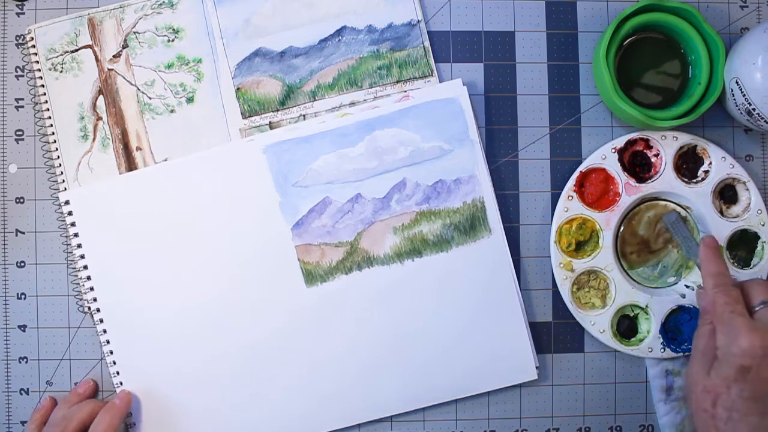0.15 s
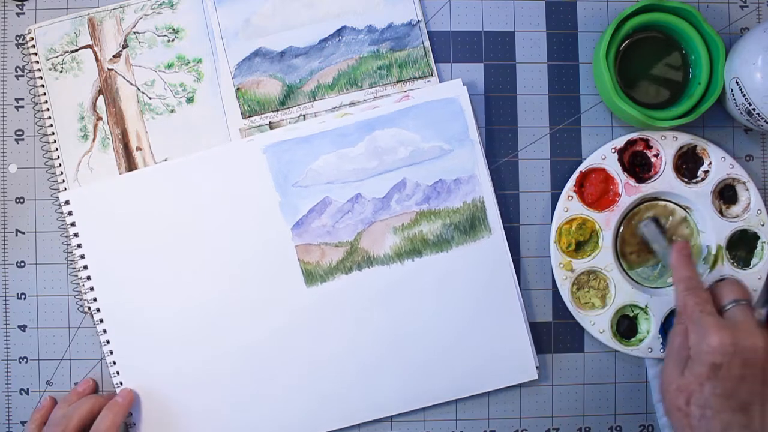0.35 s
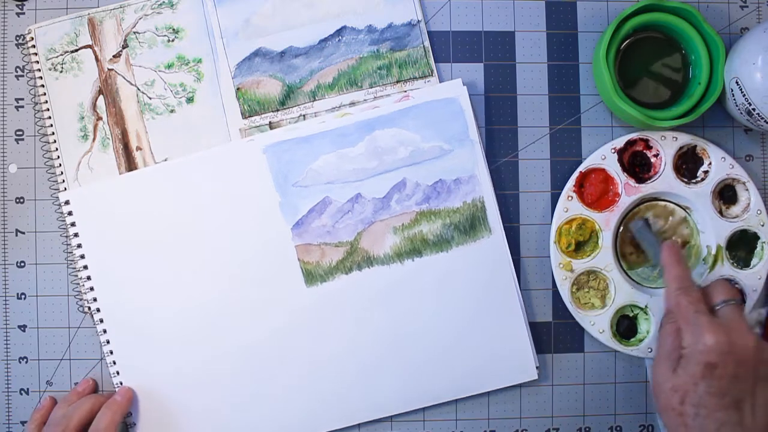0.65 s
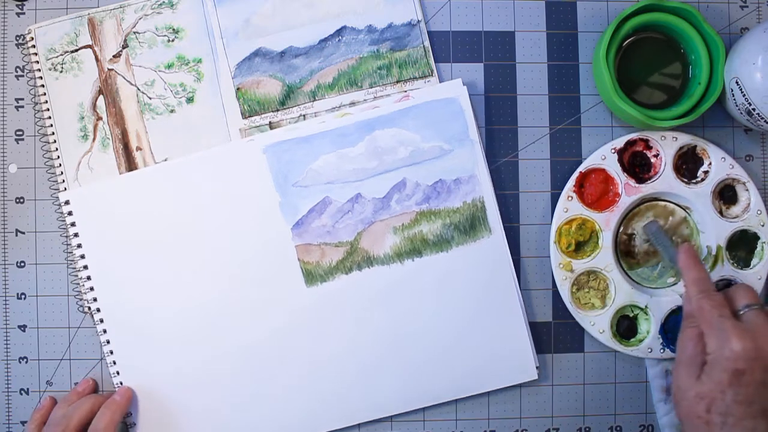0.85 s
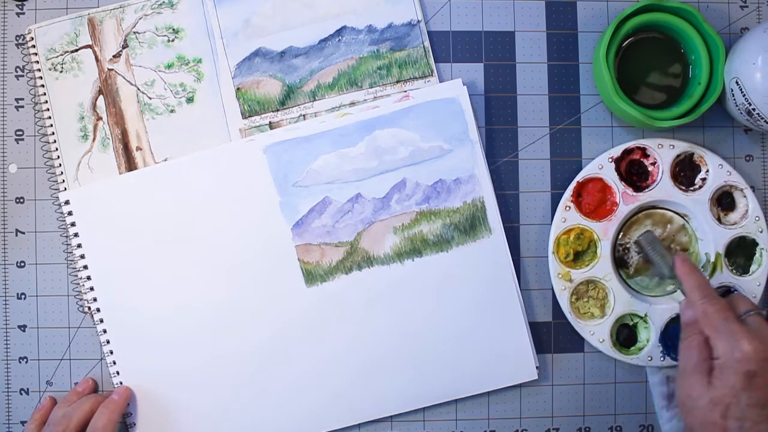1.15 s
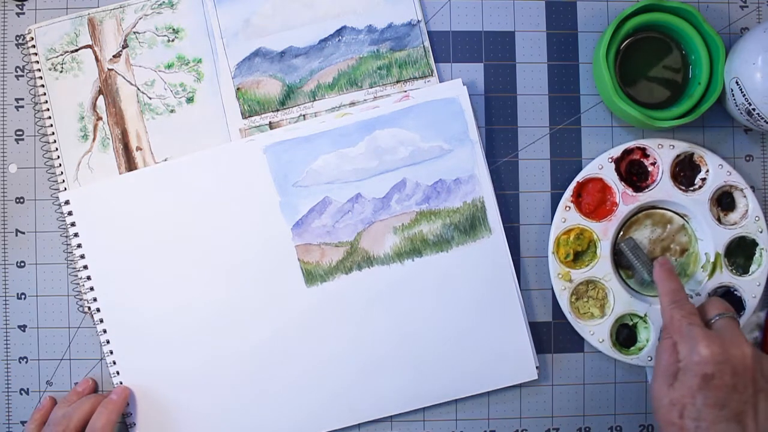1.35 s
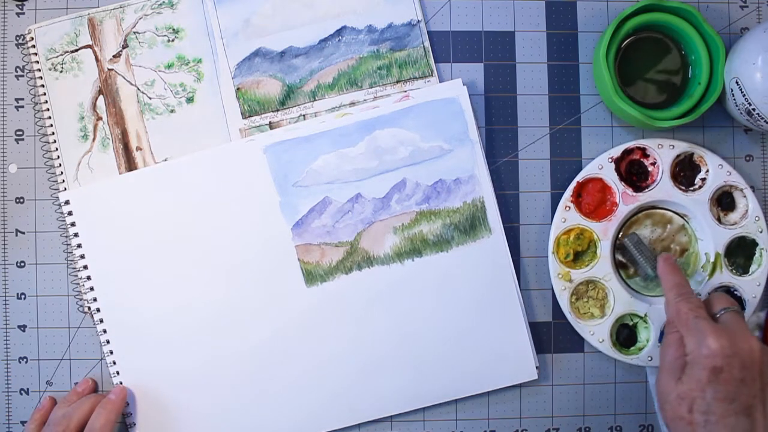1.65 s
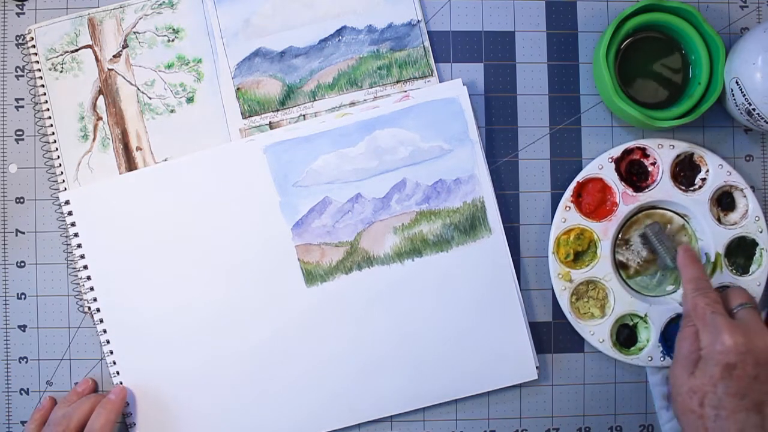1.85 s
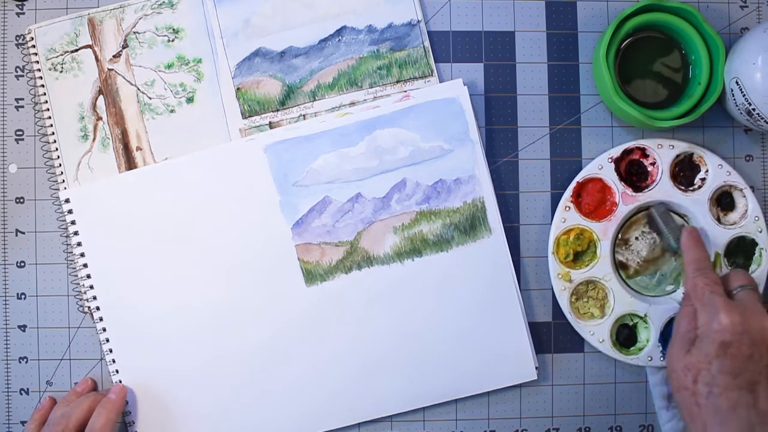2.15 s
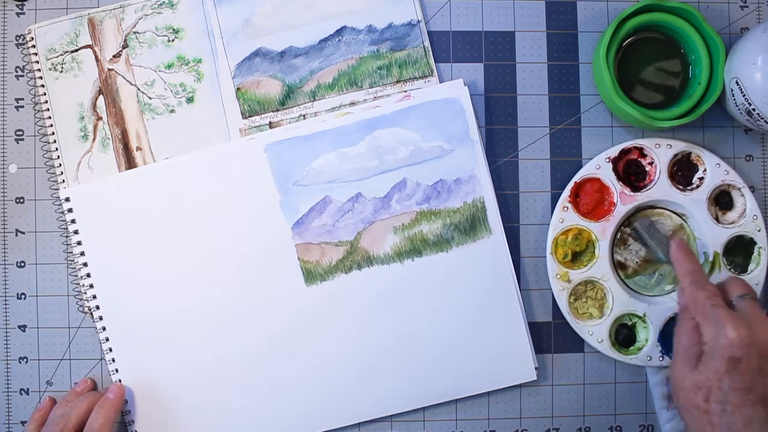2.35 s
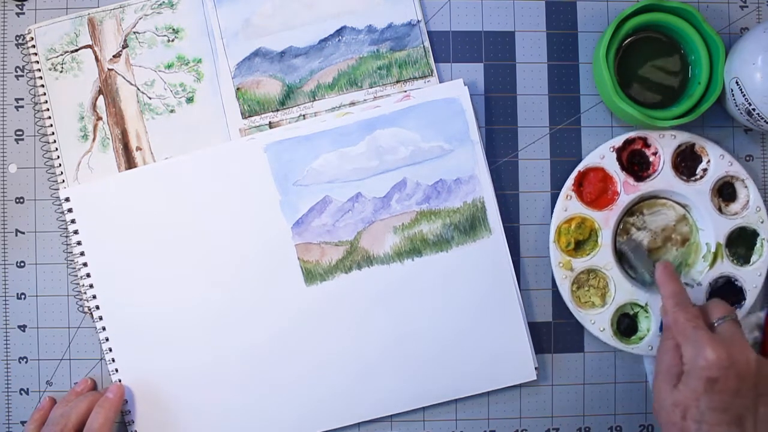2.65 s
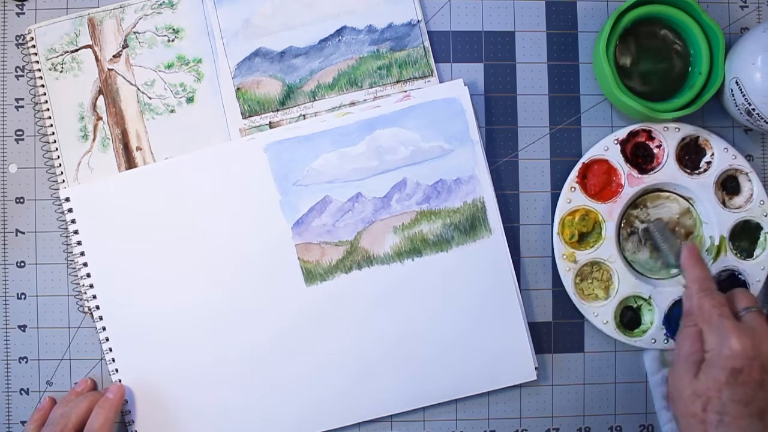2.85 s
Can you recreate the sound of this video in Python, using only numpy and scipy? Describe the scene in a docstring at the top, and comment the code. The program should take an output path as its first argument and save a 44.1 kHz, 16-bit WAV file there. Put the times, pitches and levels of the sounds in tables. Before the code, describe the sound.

Short, scratchy toothbrush strokes rub around a plastic palette well, about three a second, after a soft wet smear. The bristles bite, drag and snap free while the paint faintly pops and fizzes, close up in a quiet room.

```python
"""One soft wet wipe, then eight short scratchy strokes: a toothbrush scrubs paint in a plastic palette.
In each stroke the bristles bite, drag and lift; their stick-slip friction is a dense train of tiny
clicks, and bent tufts snap free on the way. These forces excite the resonances of the palette.
Wet paint squelches, pops and fizzes, and the palette bumps the table once, in a small quiet room."""
import sys
import numpy as np
from scipy import signal
from scipy.fft import rfft, irfft
from scipy.io import wavfile

SR = 44100
rng = np.random.default_rng(int(sys.argv[2]) if len(sys.argv) > 2 else 0)


def inscribe(sig):
    """Save sig as 16-bit PCM at rate SR to the path in sys.argv[1].

    A 1-D sig is mono; a 2-D sig holds one channel per row.
    Samples are clipped to [-1, 1] before scaling.
    """
    pcm = np.round(np.clip(np.atleast_2d(sig).T, -1, 1) * 32767)
    wavfile.write(sys.argv[1], SR, pcm.astype(np.int16))


N = 132300


def undb(db):
    """Amplitude ratio of a level in decibels."""
    return 10 ** (np.asarray(db) / 20)


def unit(x):
    """Normalisation to an rms of 1."""
    return x / np.sqrt(np.mean(x ** 2))


def scatter(count):
    """Gaussian variation, limited to two standard deviations."""
    return np.clip(rng.standard_normal(count), -2, 2)


def clock():
    """Time axis of one event, in seconds."""
    return np.arange(SR // 2) / SR


def gate(t, attack_s, length_s, release_s):
    """Envelope with linear attack, hold and exponential decay."""
    return np.minimum(t / attack_s, 1) * np.exp(-np.maximum(t - length_s, 0) / release_s)


def add(out, start_s, x):
    """Superposition of x on out, from start_s."""
    i = max(int(start_s * SR), 0)
    out[i:i + len(x)] += x[:max(len(out) - i, 0)]


def freqs():
    """Frequency axis of the responses, in Hz."""
    return np.maximum(np.fft.rfftfreq(4096, 1 / SR), 1)


def outline(points):
    """Spectral envelope in dB, interpolated over log frequency."""
    hz, db = np.array(points, float).T
    return np.interp(np.log(freqs()), np.log(hz), db)


def peak(hz, width_hz, lift_db):
    """One resonance: a Lorentzian curve in dB."""
    return lift_db / (1 + (2 * (freqs() - hz) / width_hz) ** 2)


def tilt(bass_db, treble_db, bass_hz=1460, treble_hz=3230):
    """Spectral tilt in dB from a low and a high shelf."""
    f = freqs()
    return bass_db / (1 + (f / bass_hz) ** 8) + treble_db / (1 + (treble_hz / f) ** 8)


def ring(x, response_db):
    """Source and filter: x drives a minimum-phase response scaled to unit energy."""
    cepstrum = irfft(np.log(undb(response_db)))
    half = len(cepstrum) // 2
    cepstrum[1:half] *= 2  # folding the cepstrum makes the filter causal
    cepstrum[half + 1:] = 0
    impulse = irfft(np.exp(rfft(cepstrum)))[:half]
    return signal.oaconvolve(x, impulse / np.linalg.norm(impulse))[:len(x)]


def flicker(x, changes_per_s=112.2, depth_db=2):
    """Amplitude modulation, band by band: the colour wavers as the bristles in contact change."""
    # bands that waver independently: centre_hz
    centres = [900, 1400, 2100, 3200, 4800, 7200, 10500]
    spectrum = rfft(x)
    log_f = np.log(np.maximum(np.fft.rfftfreq(len(x), 1 / SR), 1))
    steps, out = np.arange(len(x)) * changes_per_s / SR, 0
    for share in np.eye(len(centres)):
        waver = np.interp(steps, np.arange(1024), scatter(1024))
        band = irfft(spectrum * np.interp(log_f, np.log(centres), share), len(x))
        out = out + band * undb(depth_db * waver)
    return out


def stick_slip(t, slips_per_s, spread_db=3, catches_per_s=320, catch_db=2):
    """Stick-slip friction: tiny random impulses swell and fade as the bristles catch and let go."""
    sizes = undb(spread_db * scatter(len(t))) * np.sign(rng.standard_normal(len(t)))
    catch = np.interp(t * catches_per_s, np.arange(len(t)), scatter(len(t)))
    slips = rng.random(len(t)) < slips_per_s / SR
    return unit(flicker(slips * sizes * undb(catch_db * catch)))


def wet_paint():
    """Wet friction squelches through one broad resonance; bursting bubbles give brief noise pulses."""
    # smears of paint: start_s, rise_s, length_s, fall_s, level_db, centre_hz, lift_db, treble_db
    wipes = [(0.010, 0.0086, .270, 0.028, -53.5, 1370, 9, 5.5),
             (0.073, 0.0066, 0.095, 0.025, -44.5, 1170, 5, -4.5),
             (0.138, 0.0052, 0.013, 0.0074, -37.5, 1520, 8, 0),
             (0.082, 0.018, 0.11, 0.013, -50.5, 400, 7, -13), (2.254, 0.0046, 0.031, .016, -41, 557, 4, 3),
             (2.295, 0.0046, 0.029, 0.0061, -35, 1030, 31, -11),
             (2.339, 0.0093, 0.023, 0.0085, -31, 1090, 30, -6),
             (2.723, .006, 0.035, 0.0055, -36.5, 1350, 16, -9),
             (2.736, 0.0099, 0.086, 0.022, -47, 480, 2.5, -8)]
    # spectral envelope of wet friction: frequency_hz, gain_db
    wet_spectrum = [(60, -29), (170, -9), (280, -4), (1400, -2), (2500, -9.5), (5000, -13.5), (8000, -11.5),
                    (10000, -26), (14000, -40)]
    # bursting bubbles: start_s, level_db, centre_hz, width_hz
    pops = [(0.1877, -40.5, 8500, 5500), (0.229, -43.5, 595, 1100), (0.473, -38, 7950, 4000),
            (2.432, -42.5, 7740, 3000), (2.819, -38, 7960, 3970)]
    out, t = np.zeros(N), clock()
    for start_s, rise_s, length_s, fall_s, db, hz, lift_db, treble_db in wipes:
        force = undb(db) * gate(t, rise_s, length_s, fall_s) * stick_slip(t, slips_per_s=8000)
        colour = outline(wet_spectrum) + tilt(0, treble_db) + peak(hz, width_hz=420, lift_db=lift_db)
        add(out, start_s, ring(force, colour))
    pop_decay_s = 0.0033
    for start_s, db, hz, width_hz in pops:
        burst = undb(db) * np.exp(-t / pop_decay_s) * rng.standard_normal(len(t))
        add(out, start_s, ring(burst, peak(hz, width_hz, lift_db=30)))
    return out


def palette(bass_db, treble_db, squeak_hz, squeak_db):
    """Modal response in dB, tilted by where the brush presses, with the squeak of bent bristles."""
    # spectral envelope of the plastic body: frequency_hz, gain_db
    body_spectrum = [(35, -28), (130, -16), (330, -20.5), (500, -20), (700, -16.5), (900, -1), (1350, -4.5),
                     (2050, 2), (2300, -9), (2900, -6.5), (4600, -4), (5300, -13), (8500, -14),
                     (10000, -27), (15000, -44)]
    # resonances and one notch: centre_hz, width_hz, lift_db
    modes = [(1014, 40, 1.5), (1044, 49, 6), (1095, 16, 1.5), (1290, 15, 0.5), (1518, 40, 5.5),
             (1681, 94, 7), (1966, 105, 1.5), (2040, 160, 2.5), (2575, 92, 9.5), (2724, 188, 8.5),
             (2894, 180, 4.5), (4300, 100, -4.5), (4550, 95, 2.5), (6355, 510, 6.5)]
    body = outline(body_spectrum) + sum(peak(*mode) for mode in modes)
    return body + tilt(bass_db, treble_db) + peak(squeak_hz, width_hz=530, lift_db=squeak_db)


def scrubbing(slips_per_s=7000):
    """Impact and friction force the palette to vibrate: the tips land, bite hard, then drag lightly."""
    # hard first scrapes: start_s, length_s, level_db, bass_db, treble_db, squeak_hz, squeak_db
    bites = [(0.365, 0.033, -40.5, 0, -1, 2770, 6), (0.387, 0.029, -35, -3, -3, 2800, 7.5),
             (0.420, 0.027, -31, 4, 0, 2830, 0), (0.45, 0.031, -34, 4, 2.5, 2780, -1),
             (0.707, 0.043, -28.5, 4.5, 2, 1810, 5.5), (1.026, 0.024, -28, 2, 1.5, 1920, 4.5),
             (1.3489, 0.027, -25, 2, 0.5, 2050, 1.5), (1.663, 0.041, -24, 1.5, -1.5, 1680, -2),
             (1.929, 0.005, -27, 5.5, 6.5, 1495, 9.5), (1.946, 0.021, -26.5, 6, 0.5, 1250, 4.5),
             (2.160, 0.045, -28.5, 5.5, 2.5, 2970, 7.5), (2.214, 0.044, -31, 6.5, 2.5, 4100, 7.5),
             (2.5803, 0.043, -25, 4, 2.5, 1720, 5.5)]
    # drags: start_s, length_s, first_db, mid_db, last_db, bass_db, treble_db, squeak_hz, squeak_db
    drags = [(0.481, 0.1113, -44, -40, -34.5, -0.5, 0.5, 1890, 2),
             (0.750, 0.16, -35, -36, -39.5, -0.5, 0, 1720, 1.5),
             (1.053, 0.16, -32.5, -39.5, -35, 0.5, -1, 1840, 1.5),
             (1.381, .190, -33.5, -40, -39, 1, 1.5, 1830, 1),
             (1.708, 0.1, -42.5, -40.5, -38.5, 3.5, 4, 1880, 7.5),
             (1.968, 0.099, -36.5, -41.5, -42, 2.5, 4, 1390, 1.5),
             (2.288, 0.0776, -36.5, -33, -33.5, 3, 1.5, 1710, 4.5),
             (2.366, 0.074, -32.5, -38.5, -49.5, -1.5, 1, 2680, 0.5),
             (2.625, 0.087, -29, -43.5, -38, 9, 10.5, 2780, 4),
             (2.716, .147, -32.5, -32, -38.5, -1.5, 0, 1700, 6.5)]
    tick_lift_db, tick_decay_s, tick_treble_db = 2, 0.0033, 7  # the bright tick of landing
    out, t = np.zeros(N), clock()
    for start_s, length_s, db, bass_db, treble_db, squeak_hz, squeak_db in bites:
        tick = undb(db + tick_lift_db) * np.exp(-t / tick_decay_s) * rng.standard_normal(len(t))
        add(out, start_s, ring(tick, palette(bass_db, tick_treble_db, squeak_hz, 0)))
        contact = gate(t, attack_s=0.0019, length_s=length_s, release_s=0.0096)
        force = undb(db) * contact * stick_slip(t, slips_per_s)
        add(out, start_s, ring(force, palette(bass_db, treble_db, squeak_hz, squeak_db)))
    for start_s, length_s, first_db, mid_db, last_db, *colour in drags:
        pressure = undb(np.interp(t / length_s, [0, .5, 1], [first_db, mid_db, last_db]))
        contact = gate(t, attack_s=0.0038, length_s=length_s, release_s=0.0029)
        force = pressure * contact * stick_slip(t, slips_per_s)
        add(out, start_s, ring(force, palette(*colour)))
    return out


def fizz(brush, bursts_per_s=90, spread_db=4, relative_db=-19, top_hz=9600):
    """Bursting paint films ring as damped oscillators; their level follows the rms of the brush."""
    # resonances of the bursts: centre_hz, width_hz
    resonances = [(4400, 540), (6300, 1200), (7800, 450), (9000, 3600)]
    mean_square = signal.oaconvolve(brush ** 2, np.ones(300) / 300)[:N]
    effort, out = np.sqrt(np.abs(mean_square)), 0
    for hz, width_hz in resonances:
        bursts = (rng.random(N) < bursts_per_s / SR) * undb(spread_db * scatter(N))
        pole = np.exp((2j * hz - width_hz) * np.pi / SR)
        out = out + unit(signal.lfilter([1], [1, -pole], bursts).imag)
    out = signal.sosfilt(signal.butter(4, top_hz, fs=SR, output="sos"), out)
    return undb(relative_db) * effort * unit(out)


def palette_decay(brush):
    """Free vibration: the palette's middle range rings on faintly after the brush lifts."""
    middle = signal.butter(2, [1550, 3000], "bandpass", fs=SR, output="sos")
    return undb(-16) * signal.sosfilt(middle, reverberation(brush, t60_s=0.23, delay_s=0, top_hz=8000))


def tuft_snaps(rise_s=0.00089, decay_s=0.0016):
    """Elastic release: a bent tuft springs free and strikes the plastic within a few milliseconds."""
    # tufts letting go: start_s, level_db, treble_db, squeak_hz, squeak_db
    snaps = [(0.3855, -15, 5.5, 2920, 23.5), (0.4286, -24.5, 7, 2800, -2), (0.479, -33, 4, 4200, 6),
             (0.5160, -28.5, 3, 4100, 11), (0.573, -30, 2, 2700, 7), (0.585, -26.5, -2, 1680, 14),
             (0.7306, -16, 2.5, 2800, 0), (0.803, -27, 3, 2700, -3), (1.0332, -15, 0, 1900, 11.5),
             (1.0438, -20.5, -5, 2000, 7), (1.0494, -15, 1, 1880, 14), (1.084, -25, -9, 2000, -1),
             (1.363, -13.5, 3, 2690, 13), (1.379, -24, -12, 1900, 0), (1.4472, -22, 5.5, 1280, 14.5),
             (1.4557, -18.5, -6, 1100, 2), (1.5055, -28, 4, 3500, 19), (1.691, -35, -13, 2600, 9),
             (1.9272, -17.5, 10.5, 6100, 10), (1.957, -18, 2, 1100, 8), (2.1639, -18, -2, 2850, 12),
             (2.2168, -21, -4, 4170, 25), (2.227, -18.5, 1, 4310, 20), (2.2563, -19.5, -17, 1550, 10),
             (2.5948, -11.5, -2, 1700, 16), (2.606, -17.5, -4, 1700, 7), (2.6852, -24.5, 3.5, 2650, 3),
             (2.7623, -18.5, 10, 2900, 6.5)]
    out, t = np.zeros(N), clock()
    force = gate(t, rise_s, rise_s, decay_s)
    for start_s, db, treble_db, squeak_hz, squeak_db in snaps:
        snap = ring(force * rng.standard_normal(len(t)), palette(0, treble_db, squeak_hz, squeak_db))
        add(out, start_s, undb(db) * snap * np.linalg.norm(force) / np.linalg.norm(snap))
    return out


def table_bump(start_s=2.760, level_db=-48, decay_s=0.069):
    """Damped impact: the palette rocks against the table, which answers with a dull rumble."""
    # spectral envelope of the table: frequency_hz, gain_db
    table_spectrum = [(30, -26), (55, -15), (85, 1), (135, -1), (250, -9), (400, -18), (900, -39),
                      (4000, -68)]
    out, t = np.zeros(N), clock()
    force = undb(level_db) * np.exp(-t / decay_s) * rng.standard_normal(len(t))
    add(out, start_s, ring(force, outline(table_spectrum)))
    return out


def reverberation(x, t60_s, delay_s, top_hz, low_hz=260):
    """Diffuse reflections decay exponentially and lose some bass and treble."""
    t = clock()
    tail = rng.standard_normal(len(t)) * np.exp(-np.log(1000) * t / t60_s) * (t > delay_s)
    band = signal.butter(1, [low_hz, top_hz], "bandpass", fs=SR, output="sos")
    return signal.oaconvolve(x, signal.sosfilt(band, tail / np.linalg.norm(tail)))[:N]


def scene():
    """Superposition of direct sound, reflections from table and walls, and the hush of the room."""
    # spectral envelope of the room's background noise: frequency_hz, gain_db
    hush_spectrum = [(15, -40), (25, -12), (115, -0.5), (427, -6), (543, -6.5), (691, -8.5), (1030, -8.5),
                     (1120, -11), (2370, -14), (3440, -14.5), (3830, -17), (7480, -19), (15000, -37)]
    brush = scrubbing() + tuft_snaps()
    direct = brush + fizz(brush) + palette_decay(brush) + wet_paint() + table_bump()
    early = undb(-14) * reverberation(direct, t60_s=0.048, delay_s=0.0036, top_hz=8050)
    walls = undb(-12) * reverberation(direct, t60_s=0.29, delay_s=0.0078, top_hz=4200)
    hush = undb(-56) * ring(rng.standard_normal(N), outline(hush_spectrum))
    return (direct + early + walls + hush)[None]


def record(dry):
    """Band limiting: a steep low-pass filter removes the highest treble."""
    top_hz = 15200
    return signal.sosfilt(signal.ellip(10, .2, 80, top_hz, fs=SR, output="sos"), dry)


dry = scene()
out = record(dry)
inscribe(out)
```